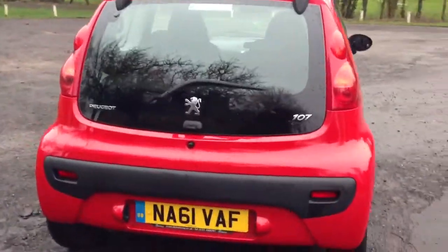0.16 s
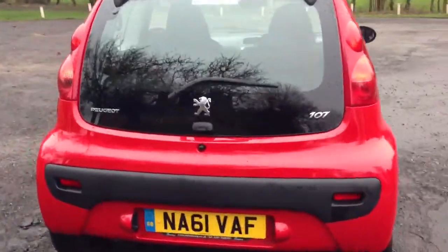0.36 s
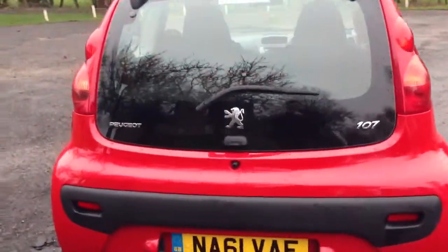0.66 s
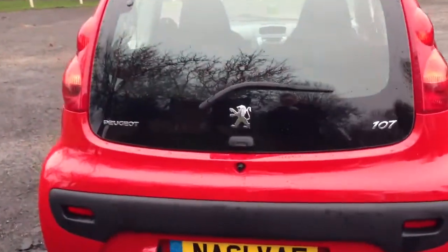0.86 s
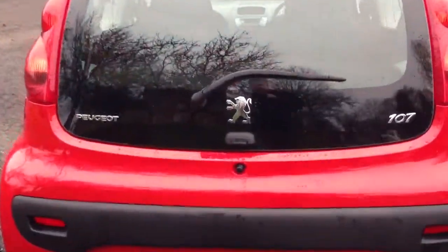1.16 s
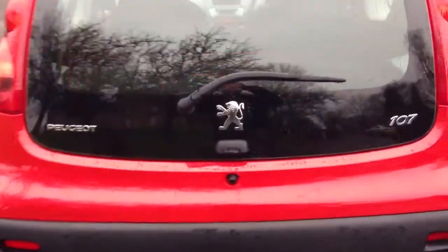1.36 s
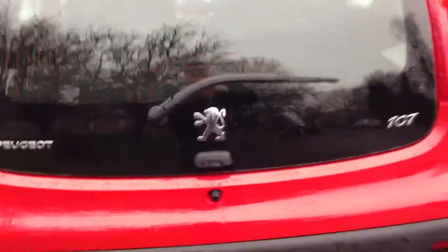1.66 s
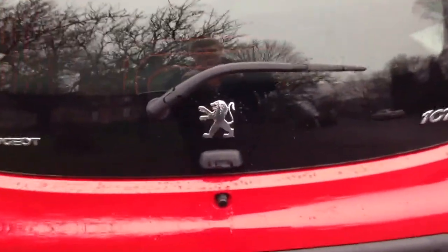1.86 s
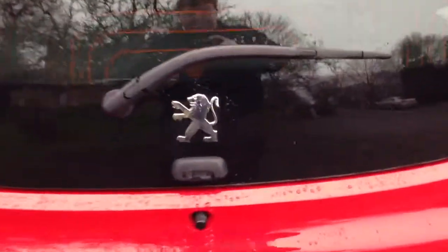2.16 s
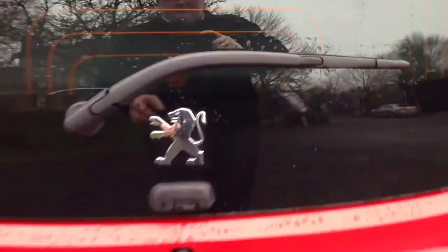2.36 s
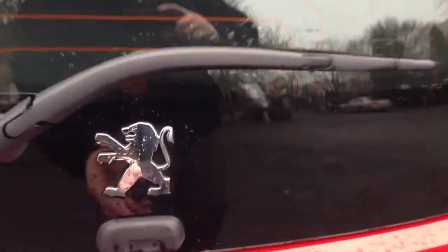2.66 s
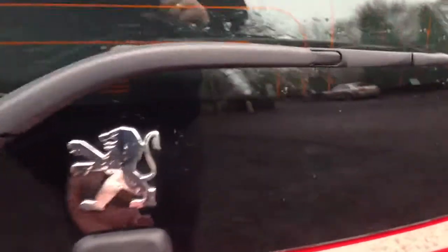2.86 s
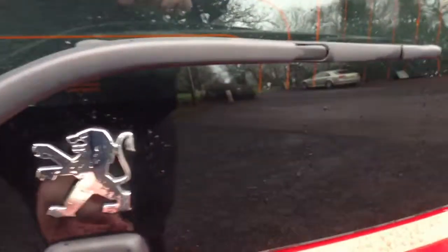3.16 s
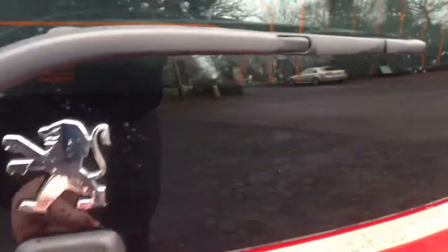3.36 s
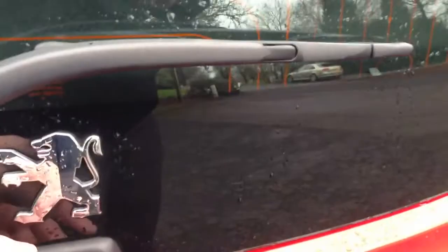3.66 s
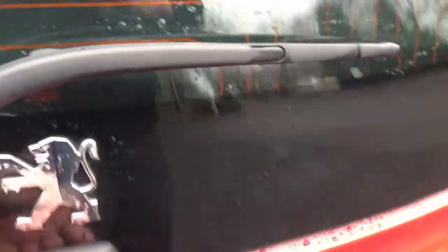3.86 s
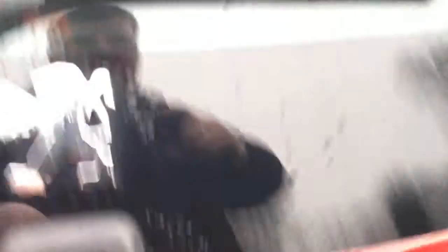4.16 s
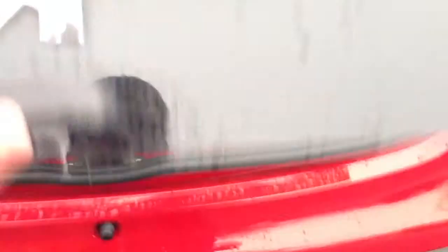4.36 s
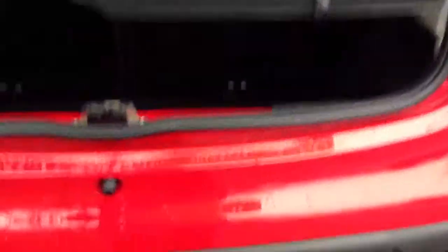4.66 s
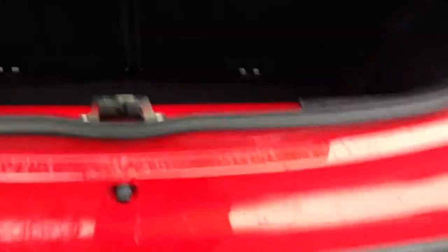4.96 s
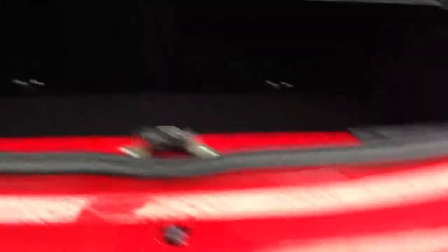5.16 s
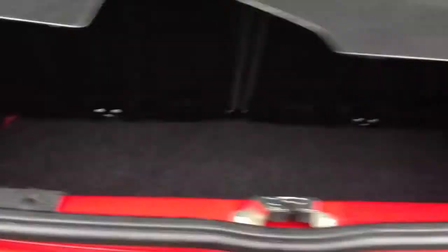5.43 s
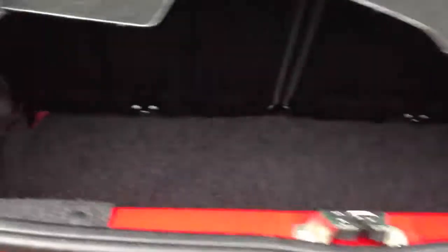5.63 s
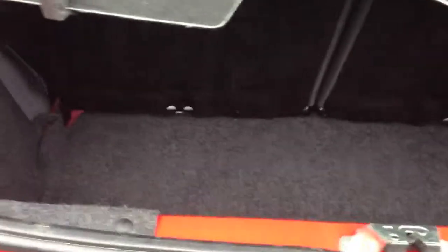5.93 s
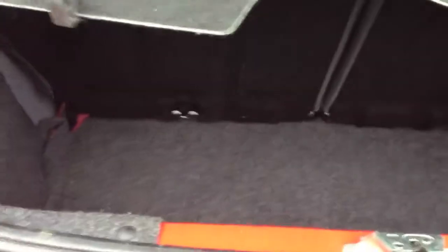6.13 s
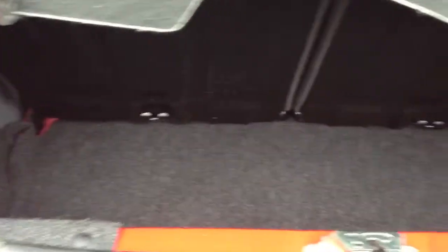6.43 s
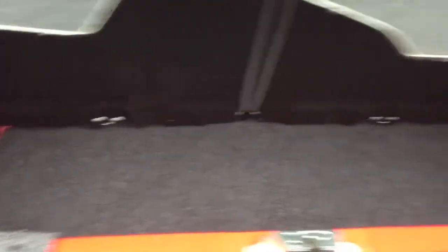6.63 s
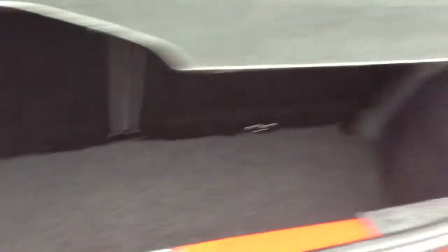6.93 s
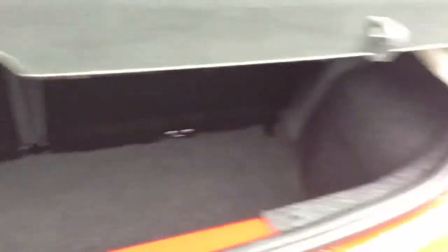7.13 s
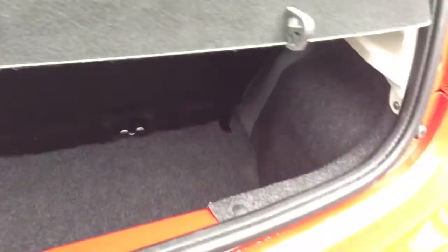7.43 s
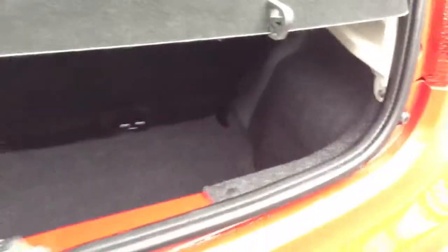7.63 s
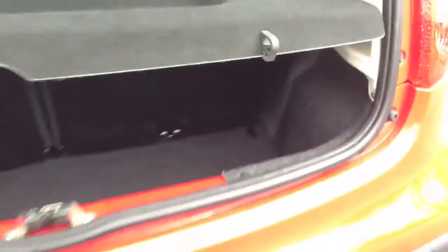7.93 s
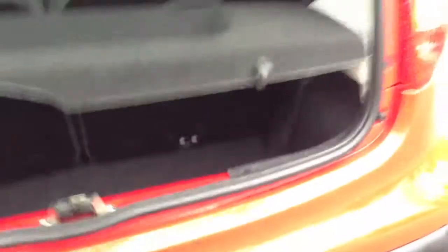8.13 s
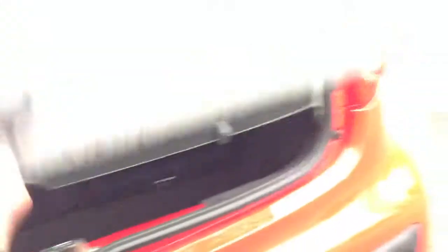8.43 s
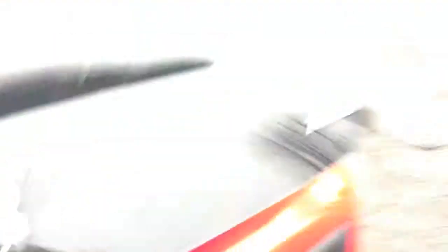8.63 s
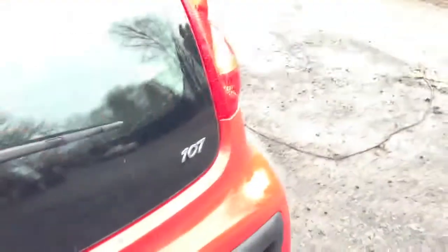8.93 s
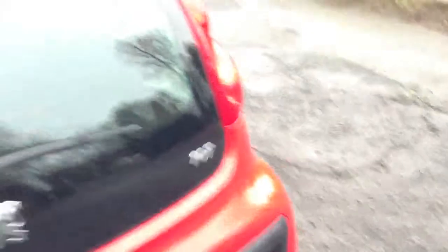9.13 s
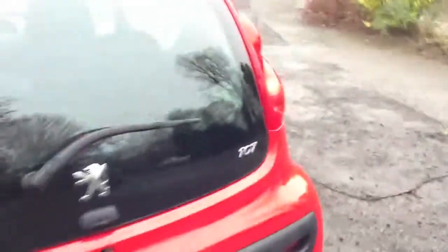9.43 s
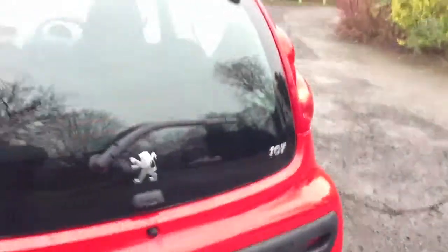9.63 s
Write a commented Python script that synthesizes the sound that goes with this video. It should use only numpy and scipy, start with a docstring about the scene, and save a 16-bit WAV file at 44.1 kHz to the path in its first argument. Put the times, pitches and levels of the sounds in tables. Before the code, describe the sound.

A small car idles softly outdoors under breezy hiss and far traffic. Muffled footfalls and grit scuffs lead to a sharp two-part latch snap, close to a small thin-bass microphone. Gas struts whisper as the rear hatch rises; faint ticks follow. Later a hand taps the hollow raised panel and the hatch slams hard, metal striking metal, with a short cabin boom and rattling plastic, leaving subdued hum and a couple of tiny ticks.

```python
"""Engine idle, far traffic and a hissing breeze in a car park; steps on grit, a latch snap, a sigh, knocks, a slam.
The latch releases a hatch that sighs up on gas struts; later a hand knocks on it and slams it, and trim rattles.
Steel, panels and cabin are sets of decaying tones, most with a crowd of weak ones made of fading noise.
Breeze, traffic and gas are coloured noise; the idle is tones on multiples of its firing rate over a rumble.
Loud hits turn the overall level down, and it slowly creeps back up."""
import sys
import numpy as np
from scipy import signal
from scipy.fft import rfft, irfft, next_fast_len
from scipy.io import wavfile
from scipy.ndimage import uniform_filter1d

SR = 44100
rng = np.random.default_rng(int(sys.argv[2]) if len(sys.argv) > 2 else 0)


def unload_wav(signal):
    """Save mono or channel-first audio to the path in sys.argv[1] as 16-bit WAV at rate SR, clipped to [-1, 1]."""
    wavfile.write(
        sys.argv[1],
        SR,
        np.round(np.clip(np.atleast_2d(signal).T, -1, 1) * 32767).astype(np.int16),
    )


N = 431738
TIME = np.arange(N) / SR
RING_SIZE = 2 ** 14   # samples in each struck sound
AGE = TIME[:RING_SIZE]   # seconds since the strike

# All table levels are relative: the functions may add further gains.
# low rumble of the engine and of moving air: [f/Hz, level/dB per Hz]
RUMBLE = [(15, -37), (40, -19.5), (70, -17), (110, -10.5), (150, 0), (230, -2.5), (310, -6), (390, -12.5),
          (600, -19.5), (1500, -46.5)]
# metal contacts in the latch: [t/s, level/dB, centre of brightness f/Hz, reach each side/octaves, panel jolt/dB]
LATCH_CLICKS = [(3.233, -22.5, 1800, 0.33, -37.5), (3.2513, -31.5, 2300, 0.56, -35.5),
                (3.2622, -30, 4300, .55, -30.5), (3.2700, -32, 1500, .5, -34), (3.29, -39, 2900, 0.3, -37),
                (3.3000, -4, 3340, 0.85, -14.5), (3.2995, -7.5, 8800, 0.5, -30),
                (3.4348, -12, 4660, 0.2, -27.5), (3.434, -25.5, 8000, .3, -39),
                (3.4564, -19, 1830, 0.59, -20), (3.4619, -26, 2780, 0.37, -34)]
# the closing hook meets the striker loop in the sill:
# [t/s, level/dB, centre of brightness f/Hz, reach each side/octaves, panel jolt/dB]
STRIKER_HITS = [(8.8961, -34, 1900, 0.38, -27), (8.913, -3, 5040, 0.63, -15.5),
                (8.9160, -1.5, 2100, 0.75, -10)]
# the rubber seal lets go of the hatch: [t/s, level/dB, hardness f/Hz]
SEAL_THUMPS = [(3.263, -27.5, 1810), (3.4615, -25, 2600)]
# the hand knocks on the raised hatch: [t/s, level/dB, hardness f/Hz]
KNOCKS = [(8.4145, -30.5, 850), (8.6140, -28, 1800), (8.6870, -28, 1300)]
# blows of loose trim after the slam: [t/s, thump on the panel/dB, clatter/dB, centre of the clatter f/Hz]
RATTLES = [(8.9197, -18.5, -17.5, 5000), (8.9223, -12, -22, 10000), (8.9257, -21, -22, 10500),
           (8.933, -12, -28, 5500), (8.9354, -19.5, -21, 3300), (8.9440, -17.5, -25.5, 2000),
           (8.9468, -30.5, -32, 12000), (8.9610, -20, -25, 3000), (8.9685, -20, -30, 3000),
           (8.9785, -26, -42, 8000), (8.9920, -28.5, -43, 4800), (8.9995, -28, -52, 9000),
           (9.0082, -28, -36, 2600), (9.0150, -32, -42, 2000), (9.033, -41, -51, 4500)]
# colour of the panel's many weak modes: [f/Hz, level/dB per Hz]
PANEL_CROWD = [(50, -38.5), (100, -23), (170, 1.5), (400, -3), (700, -6), (1100, -11.5), (2000, -13),
               (3000, -12.5), (5000, -15.5), (8000, -15.5), (15000, -20)]
# how long those weak modes last: [f/Hz, time to fall 60 dB/s]
PANEL_DECAY = [(120, 0.24), (400, 0.12), (1500, 0.08), (5000, 0.065), (14000, 0.056)]


def from_db(db):
    """Turn decibels into a gain."""
    return 10 ** (np.asarray(db) / 20)


def rms_one(x):
    """Scale a sound to unit power."""
    return x / np.sqrt(np.mean(x ** 2) + 1e-20)


def at_hz(points, hz):
    """Read a table at any frequency, along a logarithmic frequency axis."""
    known, values = np.transpose(points)
    return np.interp(np.log(np.maximum(hz, 1)), np.log(known), values)


def fade(t60):
    """A free decay that falls 60 dB in t60 seconds."""
    return np.exp(-np.log(1000) * AGE / t60)


def swell(s, length):
    """A smooth rise and fall around time s; it is down to 1/e at length seconds on either side."""
    return np.exp(-np.minimum(((TIME - s) / length) ** 2, 50))


def add(track, s, sound):
    """Mix a sound into the track at time s."""
    start = int(round(s * SR))
    track[start:start + len(sound)] += sound[:N - start]


def cut(x, hz, kind, order=2):
    """Keep only part of the spectrum with a Butterworth filter."""
    edges = np.clip(hz, 10, .47 * SR)
    sections = signal.butter(order, edges, kind, fs=SR, output="sos")
    return signal.sosfilt(sections, x + 1e-18)


def noise(spectrum):
    """Steady noise of a given colour at unit power."""
    size = next_fast_len(N)
    hz = np.fft.rfftfreq(size, 1 / SR)
    white = rfft(rng.standard_normal(size))
    return rms_one(irfft(white * from_db(at_hz(spectrum, hz)), size)[:N])


def drift(rate):
    """A random wander of unit power, with rate new values per second joined by straight lines."""
    knots = np.arange(0, TIME[-1] + 1, 1 / rate)
    values = rng.standard_normal(2 ** 10)[:len(knots)]
    return rms_one(np.interp(TIME, knots, values))


def ring(modes, spread_db):
    """A struck object sounds all its modes, with signs in turn and random strengths; starts near unit power."""
    hz, db, t60 = np.transpose(modes)
    gains = from_db(db + spread_db * rng.standard_normal(len(hz))) * (-1) ** np.arange(len(hz))
    waves = np.sin(2 * np.pi * hz[:, None] * AGE) * fade(t60[:, None])
    return gains @ waves / np.sqrt(np.sum(gains ** 2) / 2)


def crowd(spectrum, decay, tail_db, tail_t60):
    """Countless weak modes: noise that dies band by band, then lingers faintly in the car's shell."""
    hz = np.fft.rfftfreq(RING_SIZE, 1 / SR)
    random_phase = np.exp(2j * np.pi * rng.random(len(hz)))
    whole = rfft(rms_one(irfft(from_db(at_hz(spectrum, hz)) * random_phase)))
    out = 0
    for low in 40 * 2 ** np.arange(9):   # bands one octave wide
        band = irfft(whole * (hz >= low) * (hz < 2 * low))
        build = 1 - np.exp(-2 * low * AGE)   # lows take longer to build
        envelope = fade(at_hz(decay, low * np.sqrt(2))) + from_db(tail_db) * fade(tail_t60)
        out = out + band * build * envelope
    return out


def crunch(hz, length, grain_db, span):
    """A short clump of unevenly loud noise grains in a band around hz."""
    grains = rng.standard_normal(RING_SIZE) * from_db(grain_db * rng.standard_normal(RING_SIZE))
    band = rms_one(cut(grains, [hz / (1 + span), hz * (1 + span)], "band"))
    return band * np.exp(-(AGE / length) ** 2)


def traffic():
    """Far traffic blends into a steady coloured noise."""
    # colour of the traffic: [f/Hz, level/dB per Hz]
    traffic_colour = [(60, -15.5), (300, 3), (500, -1.5), (850, 0.5), (1300, -5), (2000, -9.5),
                      (3200, -12.5), (5000, -18.5), (7000, -21), (10000, -28), (15000, -42)]
    return from_db(-56.5) * noise(traffic_colour)


def breeze(hiss_db, whistle_db, width_hz, flutter_db):
    """The trees give a smooth hiss in which faint narrow whistles come and go."""
    # colour of the hiss: [f/Hz, level/dB per Hz]
    hiss_colour = [(300, -13), (1000, 4.5), (1800, -3), (2900, -5), (3900, -3.5), (4900, -1.5), (6200, -8),
                   (7200, -12.5), (9000, -19), (14000, -30.5)]
    out = noise(hiss_colour) * from_db(hiss_db + flutter_db * drift(16))
    for hz in (2236, 2520, 4420, 4540, 4880, 5320, 6180):
        edges = [hz - width_hz / 2, hz + width_hz / 2]
        whistle = rms_one(cut(rng.standard_normal(N), edges, "band", order=1))
        out += whistle * from_db(whistle_db + 0.885 * drift(4.0))
    return out


def near_surfaces(x, share, sway_s):
    """Glass, bodywork and ground mirror the treble; its ripple shifts as the microphone moves."""
    paths_s = (.0021, .0047, .0083, .0131)   # mean delays
    treble = cut(x, 456, "high")
    mirrored = sum(np.interp(TIME - delay - sway_s * drift(1.2), TIME, treble) for delay in paths_s)
    return x + share * mirrored


def faint_tones(waver_hz):
    """A faint hum of the idling engine and faint unsteady tones swell and fade."""
    # engine hum (the lowest row) and other faint tones: [t/s, swell length/s, f/Hz, level/dB]
    tone_swells = [(.15, 0.38, 96.7, -60.5), (0.347, 0.51, 1314, -65.5), (.72, 0.46, 3090, -69.5),
                   (2.203, 0.15, 163.7, -53), (6.395, 0.37, 470.6, -65)]
    wobble = waver_hz * drift(40)
    out = np.zeros(N)
    for s, length, hz, db in tone_swells:
        tone = np.sqrt(2) * np.sin(2 * np.pi * np.cumsum(hz + wobble) / SR)
        out += from_db(db) * swell(s, length) * tone
    return out


def engine(rumble_db, throb, waver_db, wander):
    """Idle tones sit on multiples of the firing rate, over a rumble that throbs with each firing."""
    # idle tones: [multiple of the firing rate, level/dB]
    idle_tones = [(4, -21), (7, -11.5), (8, -5), (9, -10), (10, -14.5), (11, -6.5), (12, -19), (13, -14)]
    # idle speed: [t/s, firing rate f/Hz]
    idle_speed = [(0, 23.3), (2.0, 23.15), (3.2, 22.88), (6.5, 22.82), (9.7, 22.8)]
    firing_hz = np.interp(TIME, *np.transpose(idle_speed))
    turn = 2 * np.pi * np.cumsum(firing_hz * (1 + wander * drift(1.5))) / SR
    tones = np.zeros(N)
    for multiple, db in idle_tones:
        phase = 2 * np.pi * rng.random()
        tones += from_db(db + waver_db * drift(4)) * np.sin(round(multiple) * turn + phase)
    rumble = from_db(rumble_db) * noise(RUMBLE) * (1 + throb * np.cos(turn))
    return np.sqrt(2) * tones + rumble


def background():
    """Traffic, breeze, faint tones and engine mix, with engine and breeze levels changing over time."""
    # levels before and after the hatch opens, one block each: [t/s, engine level/dB, breeze level/dB]
    background_levels = [
        [(0.0, -52.5, -57), (1.25, -50, -56), (1.75, -51, -56.5), (2.16, -49, -57), (2.87, -47.5, -63),
         (3.2, -46.5, -65.5)],
        [(4.2, -53.5, -65), (4.94, -50.5, -60), (5.8, -53.5, -68), (7.63, -53, -66.5), (8.09, -53.5, -61.5),
         (8.4, -48.5, -61), (9.7, -51.5, -60.5)],
    ]
    s, *columns = np.vstack(background_levels).T
    engine_gain, breeze_gain = [from_db(np.interp(TIME, s, column)) for column in columns]
    air = traffic()
    air += breeze_gain * breeze(hiss_db=1.5, whistle_db=-18.0, width_hz=29, flutter_db=1.54)
    air = near_surfaces(air, share=0.16, sway_s=0.0003) + faint_tones(waver_hz=5.74)
    return air + engine_gain * engine(rumble_db=-3.0, throb=0.34, waver_db=2.5, wander=0.004)


def steps_and_scuffs(thud_hz, thud_t60):
    """Soles thud as a fading low tone; grit and rubbing parts crunch in short clumps of grains."""
    # soft footfalls: [t/s, level/dB]
    footfalls = [(1.116, -36.5), (1.295, -38.5), (2.899, -43), (2.99, -43), (7.99, -38)]
    # soles on grit, rub of sleeve and release button: [t/s, level/dB, length/s, centre f/Hz]
    scuffs = [(1.202, -42, 0.008, 1600), (1.218, -53, 0.063, 1570), (1.288, -47.5, .032, 1780),
              (1.89, -46, 0.0093, 1600), (1.927, -50, 0.019, 1600), (1.954, -42.5, 0.019, 1650),
              (2.612, -45, .005, 1600), (2.899, -51, 0.013, 670), (3.381, -51, 0.0067, 1790),
              (4.887, -51, .012, 950), (4.895, -55.5, .028, 4900), (4.911, -52, 0.014, 1700),
              (8.714, -53.5, 0.03, 2620), (9.113, -54.5, 0.022, 3000)]
    # small sharp ticks of grit and trim: [t/s, level/dB, centre f/Hz]
    ticks = [(.462, -57, 7000), (1.897, -49, 4000), (4.815, -55, 3400), (4.823, -49, 2600),
             (4.893, -58, 8400), (5.915, -53, 4930), (9.360, -45, 4470), (9.377, -46, 2800)]
    out = np.zeros(N)
    for s, db in footfalls:
        add(out, s, from_db(db) * np.sin(2 * np.pi * thud_hz * AGE) * fade(thud_t60))
    for s, db, length, hz in scuffs:
        add(out, s, from_db(db) * crunch(hz, length, grain_db=4.5, span=0.44))
    for s, db, hz in ticks:
        add(out, s, from_db(db) * crunch(hz, length=0.0081, grain_db=8.0, span=0.71))
    return out


def struts(drag_db, squeak_width_hz):
    """Gas hisses in the struts as the hatch rises; the seals drag unevenly and give thin rising squeaks."""
    # colour of the sigh: [f/Hz, level/dB per Hz]
    sigh_colour = [(5000, -22), (7500, -6), (8800, 0), (9300, -4), (9800, 0), (10500, -6), (12300, -4),
                   (14000, -7), (16000, -11)]
    # squeaks of the seals: [t/s, swell length/s, f/Hz, glide/Hz per s, level/dB]
    squeaks = [(5.36, .06, 7700, 9000, -72), (5.38, .04, 11200, 11000, -70.5), (5.62, .35, 8750, 302, -76),
               (5.62, .28, 9800, 900, -78), (5.64, .08, 12300, 3000, -77)]
    out = swell(s=5.42, length=0.51) * from_db(-69.5) * noise(sigh_colour)
    for s, length, hz, glide, db in squeaks:
        pitch = hz + glide * np.clip(TIME - s, -2 * length, 2 * length)
        rasp = rms_one(cut(rng.standard_normal(N), squeak_width_hz, "low"))
        out += from_db(db) * swell(s, length) * rasp * np.sin(2 * np.pi * np.cumsum(pitch) / SR)
    return out * from_db(drag_db * drift(25))


def falling_hatch_air():
    """The falling hatch pushes air: a low rumble that swells and fades."""
    return from_db(-48) * swell(s=8.8, length=0.21) * noise(RUMBLE)


def knocks(modes_db, crowd_db):
    """The hand knocks the raised hatch, which hangs free and rings low and hollow."""
    # ringing of the raised hatch: [f/Hz, level/dB, time to fall 60 dB/s]
    raised_modes = [(216, 0, 0.12), (269, 2, .07), (410, -4.5, .08), (560, -6, 0.069), (670, -9, 0.082),
                    (790, -12, .08), (950, -16, .07), (2130, -12, 0.036)]
    out = np.zeros(N)
    for s, db, hz in KNOCKS:
        blow = from_db(modes_db) * ring(raised_modes, spread_db=0.5)
        blow += from_db(crowd_db) * crowd(PANEL_CROWD, PANEL_DECAY, tail_db=-12.0, tail_t60=0.15)
        add(out, s, from_db(db) * cut(blow, hz, "low"))
    return out


def panel(blows, modes_db, crowd_db, buzz_db, buzz_per_s):
    """Each blow rings the panel and its uneven buzz; a harder contact reaches further into the treble."""
    # ringing of the panel: [f/Hz, level/dB, time to fall 60 dB/s]
    panel_modes = [(174, -13, .1), (218, -9, .11), (387, 0, 0.079), (430, -1, 0.082), (620, -9, .07),
                   (742, -10, .06), (955, -17, .07), (1330, -19.5, .06), (1707, -9, .05), (2025, -11, .051),
                   (2310, -6, 0.047), (2510, -8.5, 0.055)]
    out = np.zeros(N)
    for s, db, hardness_hz in blows:
        chatter = np.interp(AGE * buzz_per_s, np.arange(RING_SIZE), rng.standard_normal(RING_SIZE))
        weak_modes = crowd(PANEL_CROWD, PANEL_DECAY, tail_db=-14.5, tail_t60=0.15)
        blow = from_db(crowd_db + buzz_db * chatter) * weak_modes
        blow += from_db(modes_db) * ring(panel_modes, spread_db=3.5)
        add(out, s, from_db(db) * cut(blow, hardness_hz, "low"))
    return out


def panel_blows():
    """List what strikes the panel (latch jolts, seal, trim taps) as time, level in dB and hardness in Hz."""
    jolt_lag_s, jolt_hardness = 0.001018, 1.26   # hardness as a multiple of the click's brightness
    contacts = LATCH_CLICKS + STRIKER_HITS
    jolts = [(s + jolt_lag_s, jolt_db, hz * jolt_hardness) for s, _, hz, _, jolt_db in contacts]
    # loose trim answers each knock with a small, later tap
    tap_lag_s, tap_loss_db, tap_hardness_hz = 0.033, 16.5, 3200
    taps = [(s + tap_lag_s, db - tap_loss_db, tap_hardness_hz) for s, db, _ in KNOCKS]
    return jolts + SEAL_THUMPS + taps


def trim_thumps(lowest_hz):
    """Loose trim slaps the panel, but is too light to stir its bass."""
    hardness_hz = 3540
    slaps = [(s, db, hardness_hz) for s, db, _, _ in RATTLES]
    thumps = panel(slaps, modes_db=-8.0, crowd_db=-1.0, buzz_db=3.0, buzz_per_s=400)
    return cut(thumps, lowest_hz, "high", order=1)


def trim(ring_db, buzz_db, buzz_s, octaves):
    """Each loose part chatters in three quick, uneven touches and rings the trim around its own pitch."""
    # ringing of the trim: [f/Hz, level/dB, time to fall 60 dB/s]
    trim_modes = [(1120, -6, .1), (1370, -0.5, .12), (1690, -2, .1), (1880, -1, .1), (1980, -2, .13),
                  (2380, -5, .07), (2730, 0, .08), (3370, 3, .06), (4380, -1, 0.055), (6330, 1, .05),
                  (8900, -1, .035), (12000, -1, .022), (14050, -6, .025)]
    chatter_s, chatter_loss_db = .0022, 5.5   # mean gap and loss from touch to touch
    out = np.zeros(N)
    for s, _, db, hz in RATTLES:
        for touch in range(3):
            edges = [hz / 2 ** octaves, hz * 2 ** octaves]
            click = from_db(ring_db) * cut(ring(trim_modes, spread_db=2.5), edges, "band")
            click += from_db(buzz_db) * crunch(hz, buzz_s, grain_db=5.5, span=0.6)
            add(out, s, from_db(db - chatter_loss_db * touch) * click)
            s = s + chatter_s * (.5 + rng.random())
    return out


def cabin(boom_db):
    """The slam sets the body shell and the air inside booming; seal thumps and knocks do so faintly."""
    # booming of the cabin: [f/Hz, level/dB, time to fall 60 dB/s]
    boom_modes = [(97, -15.5, 0.41), (125.2, -1.5, 0.3), (150, 0.5, .24), (172, 2.5, .24),
                  (201.6, 4.5, 0.25), (240.7, -4, .17), (312.2, 3, .17), (364.5, 2, 0.14),
                  (406, -3.5, 0.12), (483, -0.5, .15), (532, -16.5, .2), (578, -13, 0.16),
                  (686, -15.5, .15), (808, -18, .15), (854, -13, .15)]
    slam_s, light_blow_db = 8.9148, -12
    out = np.zeros(N)
    add(out, slam_s, from_db(boom_db) * ring(boom_modes, spread_db=1.0))
    for s, db, _ in SEAL_THUMPS + KNOCKS:
        add(out, s, from_db(db + light_blow_db) * ring(boom_modes, spread_db=2.0))
    return out


def metal(contacts, modes, modes_db, crowd_db, bounce_s, bounce_db):
    """Each contact rings the steel, most strongly around its own centre of brightness, and bounces once."""
    # colour of the steel's many weak modes: [f/Hz, level/dB per Hz]
    steel_crowd = [(300, -18), (1000, 1), (2000, -13.5), (2900, -0.5), (5000, -4), (6300, -17), (7500, -10),
                   (9000, -13), (12000, -19), (15500, -23)]
    # how long those weak modes last: [f/Hz, time to fall 60 dB/s]
    steel_decay = [(500, 0.114), (3000, 0.028), (6000, 0.014), (14000, 0.032)]
    out = np.zeros(N)
    for s, db, hz, octaves, _ in contacts:
        edges = [hz / 2 ** octaves, hz * 2 ** octaves]
        for lag, change_db in ((0, 0), (bounce_s, bounce_db)):
            click = from_db(modes_db) * ring(modes, spread_db=2.5)
            click += from_db(crowd_db) * crowd(steel_crowd, steel_decay, tail_db=-25.5, tail_t60=0.051)
            add(out, s + lag, from_db(db + change_db) * cut(click, edges, "band"))
    return out


def latch():
    """The latch parts click against each other and ring briefly."""
    # ringing of the latch: [f/Hz, level/dB, time to fall 60 dB/s]
    latch_modes = [(1862, 0, .056), (2540, 2, .035), (2810, 7.5, 0.033), (3120, 7, 0.022),
                   (3320, 3, 0.0298), (3610, -2, 0.03), (3860, 3, 0.032), (4230, 0, 0.027), (4580, 3, .028),
                   (4930, 3.5, 0.021), (5560, -4, .022), (7330, -2, 0.026), (8290, -1, 0.027),
                   (10000, -16, 0.032), (11480, -14.5, .035), (13800, -16, 0.026)]
    return metal(LATCH_CLICKS, latch_modes, modes_db=-1.5, crowd_db=-3.0, bounce_s=0.0029, bounce_db=-2.5)


def striker():
    """The closing hook lands on the striker loop, which rings lower than the latch."""
    # ringing of the striker: [f/Hz, level/dB, time to fall 60 dB/s]
    striker_modes = [(1400, -1, .04), (1620, 1, .04), (1970, 0.5, .07), (2212, 2.5, 0.06),
                     (2530, -3, 0.055), (3380, 4, 0.041), (4370, -1, .045), (5220, 3, .025),
                     (5520, 4, 0.025), (6020, -0.5, 0.036), (9050, -12, .027)]
    return metal(STRIKER_HITS, striker_modes, modes_db=-4.5, crowd_db=-3.0, bounce_s=0.0044, bounce_db=-13.5)


def hatch_sounds():
    """Knocks, panel, trim, cabin and steel together make the sound of the hatch."""
    hatch = knocks(modes_db=-0.5, crowd_db=-6.0)
    hatch += panel(panel_blows(), modes_db=-2.5, crowd_db=-1.5, buzz_db=2.5, buzz_per_s=356)
    hatch += trim_thumps(lowest_hz=330)
    hatch += trim(ring_db=-1.0, buzz_db=2.5, buzz_s=0.003, octaves=0.65)
    hatch += cabin(boom_db=-2.5)
    hatch += latch() + striker()
    return cut(hatch, 79.0, "high")   # small panels radiate little deep bass


def car_park(x, echo_db, dull_hz):
    """Trees and parked cars scatter back a faint, dull tail."""
    scatter = rng.standard_normal(RING_SIZE) * fade(0.68) * (1 - fade(0.27))
    scatter = cut(scatter, dull_hz, "low", order=1)
    tail = signal.fftconvolve(x, scatter / np.linalg.norm(scatter))[:N]
    return x + from_db(echo_db) * tail


def scene():
    """The hatch and the footsteps are close by, with the background behind them."""
    mix = background()
    mix += steps_and_scuffs(thud_hz=228.0, thud_t60=0.19)
    mix += struts(drag_db=2.0, squeak_width_hz=150)
    mix += falling_hatch_air()
    mix += car_park(hatch_sounds(), echo_db=-50.0, dull_hz=2490)
    return mix[None]   # one channel


def gain_control(x, threshold_db, depth_db, release_db_per_s):
    """Loud sound turns the gain down at once; it creeps back up steadily."""
    power = np.abs(uniform_filter1d(x ** 2, size=128))   # averaged over 128 samples
    level_db = 10 * np.log10(power + 1e-12)
    over_db = np.clip(level_db - threshold_db, 0, depth_db)
    release_db = release_db_per_s * TIME
    held_db = np.maximum.accumulate(over_db + release_db, axis=-1) - release_db
    return x * from_db(-held_db)


def record(dry):
    """A small microphone has thin bass and its own hiss; gain control, rounded peaks and a treble cut follow."""
    x = cut(dry, 55, "high") + from_db(-69.0) * rng.standard_normal(dry.shape)
    x = gain_control(x, threshold_db=-10.5, depth_db=6.5, release_db_per_s=4.5)
    ceiling = .85
    x = ceiling * np.tanh(x / ceiling)
    treble_cut = signal.ellip(12, .1, 80, 15250, fs=SR, output="sos")   # steep cut above 15250 Hz
    return signal.sosfilt(treble_cut, x)


dry = scene()
out = record(dry)
unload_wav(out)
```